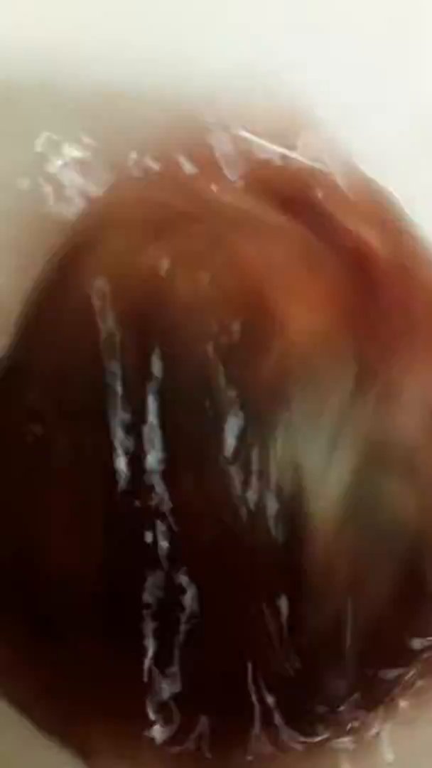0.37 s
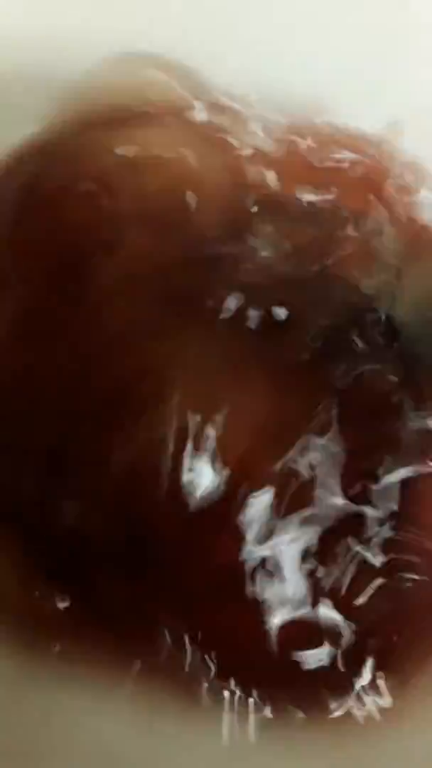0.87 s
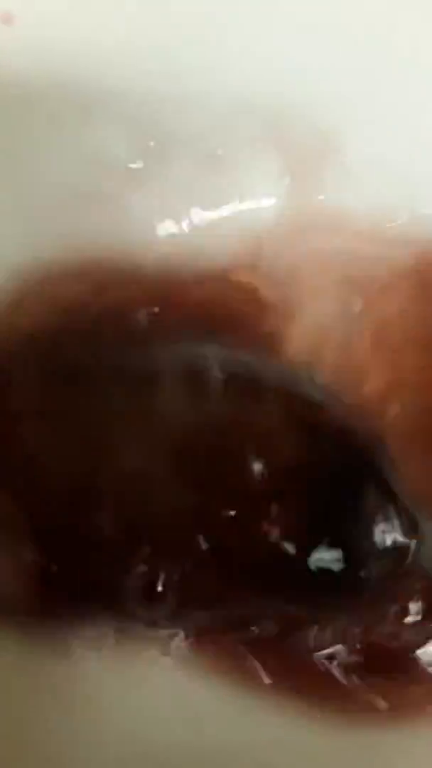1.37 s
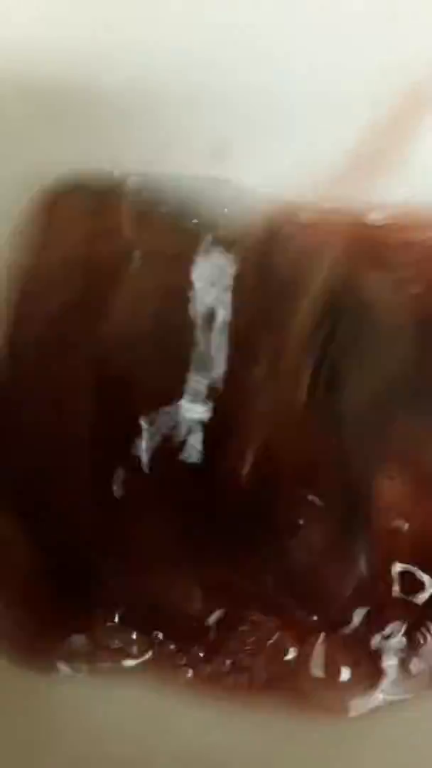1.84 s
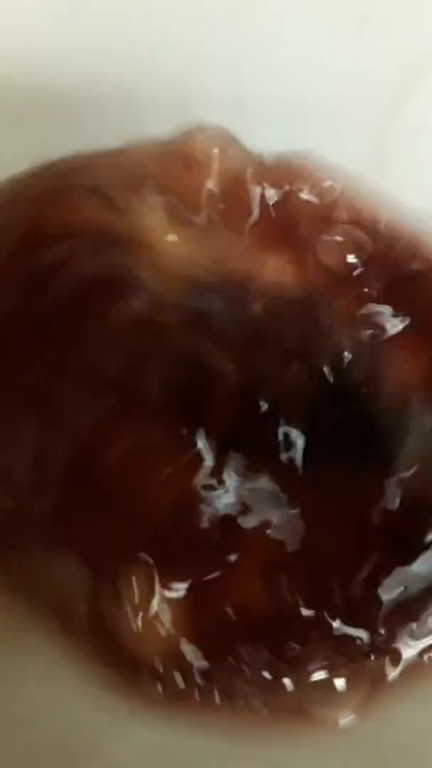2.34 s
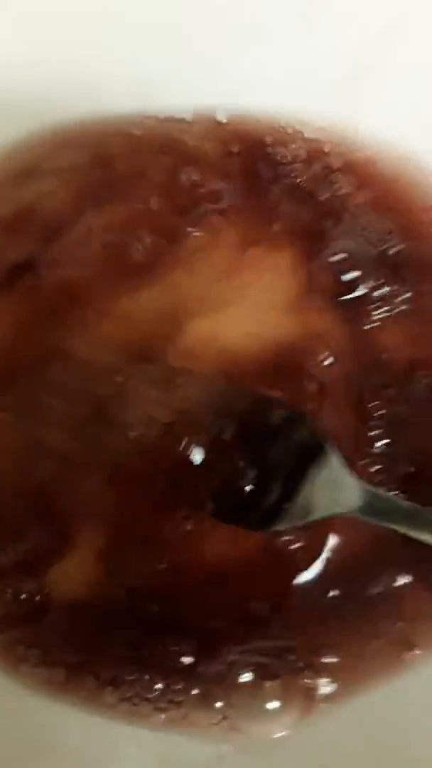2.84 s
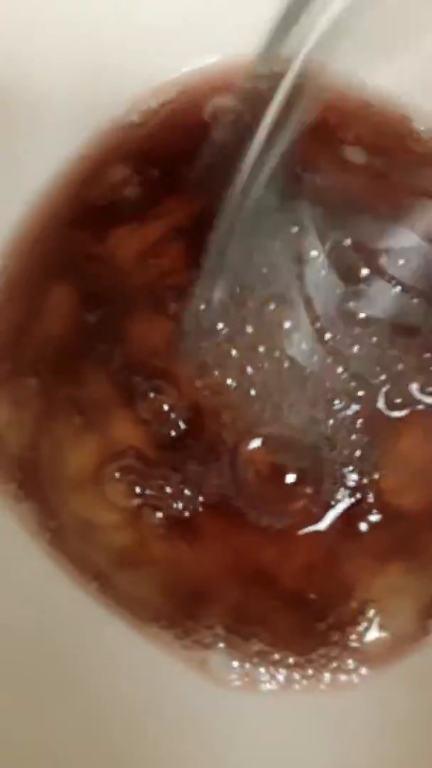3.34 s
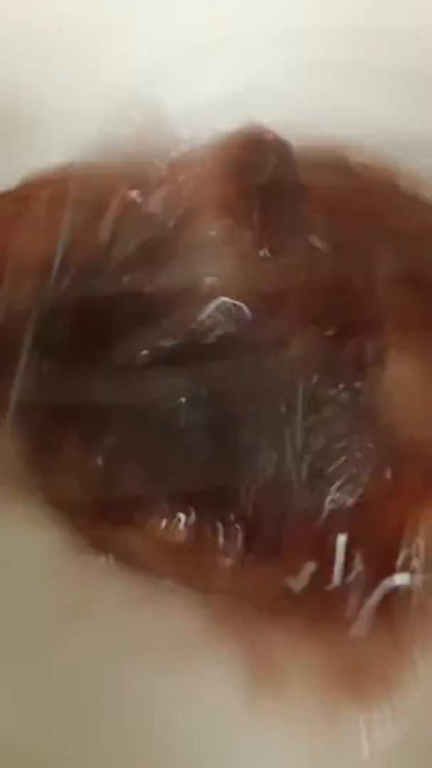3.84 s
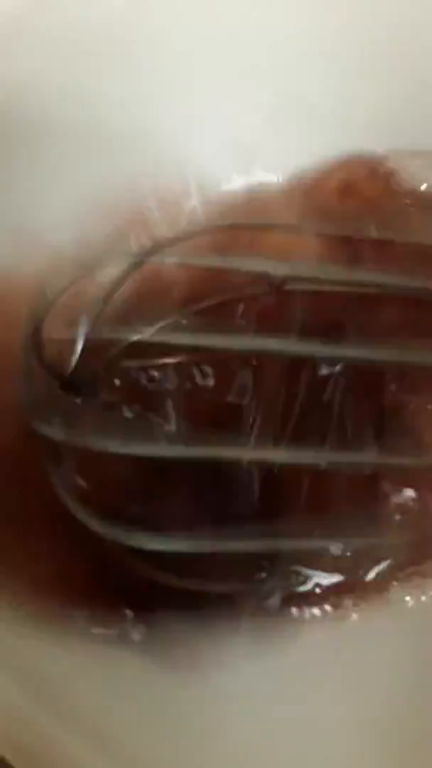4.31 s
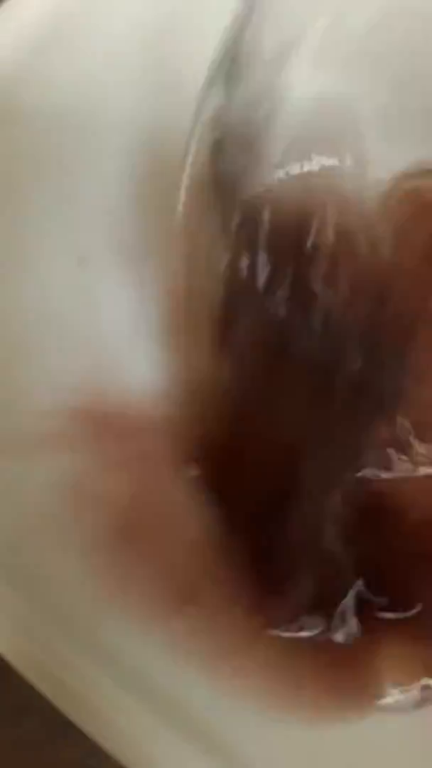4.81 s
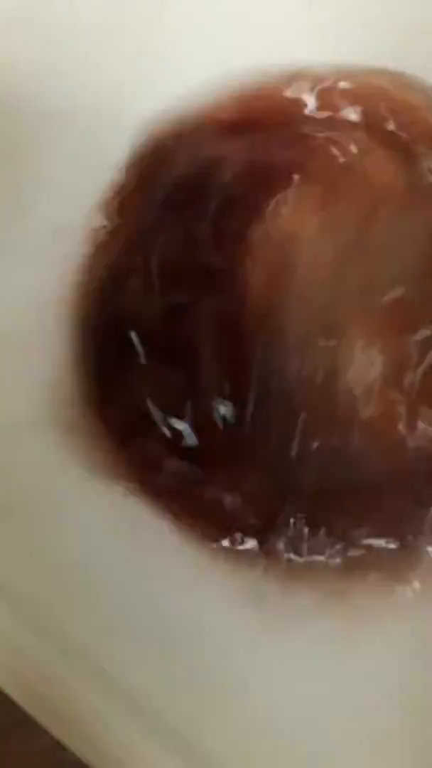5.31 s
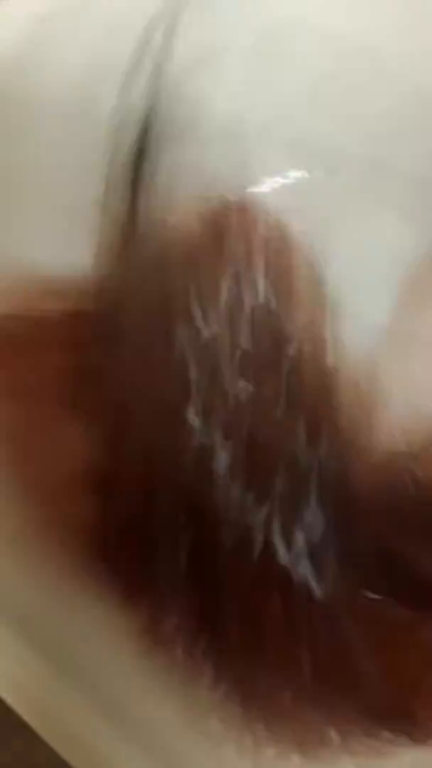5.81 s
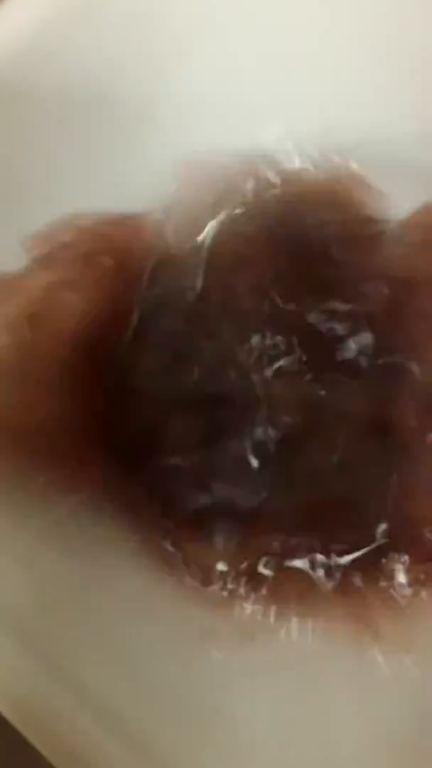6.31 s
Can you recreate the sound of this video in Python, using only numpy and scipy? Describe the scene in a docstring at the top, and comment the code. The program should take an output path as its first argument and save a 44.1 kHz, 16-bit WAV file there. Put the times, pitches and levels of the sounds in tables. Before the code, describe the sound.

A close stereo pickup, leaning left, catches quick regular strokes of a fork ringing against a ceramic bowl, with soft counter knocks and bubbly plops from thick liquid. After a brief near-silent gap, louder room hum and hiss come in and a wire whisk starts, its strokes more smeared and wiry, with small bubbles chirping. Short echoes suggest a small kitchen.

```python
"""A fork clinks as it beats a thick liquid in a glazed bowl on a kitchen counter; after a pause a whisk takes over.
Each stroke is a cluster of metal touches that rings tool, bowl and counter, each made of dying sines.
Air pockets plop and small bubbles and drops chirp in the liquid, as short sines that rise in pitch.
A close pair of microphones also hears echoes of the small room, and rumble, hum and hiss made of shaped noise.
This background mostly sinks through each tool's turn and comes back louder when the whisk's turn starts."""
import sys
import numpy as np
from scipy import signal
from scipy.fft import rfft, irfft
from scipy.io import wavfile

SR = 44100
rng = np.random.default_rng(int(sys.argv[2]) if len(sys.argv) > 2 else 0)


def decibels_to_gain(level_db):
    """Convert a level in decibels to a linear amplitude gain (20 dB per decade)."""
    exponent = np.asarray(level_db, float) / 20
    return 10 ** exponent


def unload_audio(sound):
    """Save the sound as a 16-bit wav file, at the path given as the first command line argument."""
    columns = np.transpose(np.atleast_2d(sound))
    # keep every value between -1 and 1, then stretch to whole-number steps
    steps = np.round(np.clip(columns, -1, 1) * 32767)
    wavfile.write(sys.argv[1], SR, steps.astype(np.int16))


N = 283122  # length [samples]

# All levels in the tables are relative: the functions add their own gain.
# firm strokes: (time [s], metal tick [dB], bowl note [Hz], bowl note level [dB], low push [dB])
FIRM_STROKES = [(0.0536, -26, 1899, -19, -38), (0.2718, -22.5, 1777, -26.5, -25.5),
                (0.33, -29.5, 1710, -27, -49.5), (0.473, -19, 1800, -21.5, -23),
                (0.526, -27, 1687, -14, -56.5), (0.6736, -21, 2046, -29.5, -17),
                (0.879, -22, 1800, -22, -36.5), (0.9436, -36, 1886, -26.5, -50),
                (1.082, -20.5, 1838, -21, -29.5), (1.161, -36, 1593, -36, -80),
                (1.2941, -20.5, 2030, -23, -34), (1.3507, -36.5, 1795, -26, -75.5),
                (1.502, -22, 1810, -21.5, -45), (1.71, -18.5, 1708, -22.5, -58),
                (1.928, -26, 1738, -16.5, -60), (2.1257, -23, 1628, -20.5, -67),
                (2.195, -39, 1763, -33.5, -74), (2.333, -28, 1745, -21.5, -64),
                (3.584, -19.5, 1900, -25, -47), (3.8172, -21, 1953, -16, -53),
                (4.0337, -20.5, 1983, -18, -68), (4.246, -21, 1800, -21, -56),
                (4.4658, -20, 2290, -18, -42), (4.68, -16.5, 1953, -19, -35.5),
                (4.888, -16, 1800, -19.5, -50), (5.0646, -20, 1790, -30.5, -41),
                (5.09, -28.5, 1800, -31.5, -62), (5.287, -27.5, 1747, -25, -67),
                (5.356, -37.5, 1960, -39.5, -62), (5.488, -23, 1840, -21, -66),
                (5.5497, -25, 1790, -39, -65), (5.688, -16.0, 1860, -11, -35),
                (5.8924, -17.5, 1860, -22.5, -30), (6.093, -22.5, 1830, -22.5, -62),
                (6.3009, -20, 1874, -24.5, -35)]
# light, glancing touches between the strokes: (time [s], metal tick [dB])
LIGHT_TOUCHES = [(0.0447, -54), (0.114, -46), (0.155, -53), (0.211, -60), (0.456, -34), (0.515, -45),
                 (0.557, -36), (0.597, -53.5), (0.657, -45.5), (0.722, -42), (0.868, -48), (0.8745, -34),
                 (1.036, -56.5), (1.071, -38.5), (1.127, -46.5), (1.274, -53), (1.287, -43), (1.55, -39),
                 (1.7, -35.5), (1.775, -54), (1.911, -41.5), (1.968, -41), (2.055, -59.5), (2.113, -38),
                 (2.282, -56), (2.321, -38.5), (2.435, -43.5), (2.492, -55.5), (3.721, -55.5), (3.802, -48),
                 (3.856, -45.5), (3.889, -46.5), (4.03, -53), (4.232, -47.5), (4.458, -38.5),
                 (4.561, -53.5), (4.616, -55), (4.672, -38), (4.726, -41), (4.869, -49.5), (5.249, -57.5),
                 (5.269, -36.5), (5.472, -42.5), (5.478, -25), (5.683, -35), (5.798, -55.5), (5.868, -51.5),
                 (6.08, -46.5), (6.267, -49.5)]
# ringing modes of the fork: (pitch [Hz], width [Hz], level [dB])
FORK_MODES = [(2945, 17, -12), (3740, 190, -6), (4850, 160, -12.5), (6050, 83, -4.5), (7336, 26, 5),
              (8430, 340, 0.5), (8950, 28, -7.5), (9170, 73, -4), (10170, 190, -6.5), (10620, 43, -7.5),
              (10650, 72, -26.5), (12800, 220, -29), (14400, 170, -24), (13200, 130, -26.5)]
# ringing modes of the wire whisk: (pitch [Hz], width [Hz], level [dB])
WHISK_MODES = [(3344, 630, 8), (4075, 51, -10), (4300, 15.1, -6), (5640, 360, -0.5), (5910, 20, -10.5),
               (6240, 31, -10), (6830, 37, -8), (7600, 400, 6.5), (8320, 260, 5), (9770, 360, -0.5),
               (11780, 110, -15), (13100, 400, -18.5)]
# strokes that set the dry rim of the bowl ringing: (time [s], level [dB])
RIM_HITS = [(.472, -54), (1.501, -62), (2.333, -56), (3.583, -55), (3.817, -54), (4.034, -65), (5.487, -62)]
# air pockets plopping, mostly together with a touch of the tool: (time [s], peak level [dB], pitch [Hz])
AIR_PLOPS = [(0.208, -51, 1120), (0.453, -31.5, 1030), (1.07, -30, 1260), (1.162, -42, 888),
             (1.276, -29.5, 1410), (1.661, -40, 1140), (1.704, -13, 1095), (1.819, -26, 860),
             (1.91, -26, 1210), (2.114, -24, 1055), (2.317, -41, 1010), (2.433, -39, 1390),
             (4.231, -25.5, 1080), (5.353, -39, 1085), (5.544, -29, 883), (6.088, -23.5, 1050),
             (6.209, -32.5, 813), (6.267, -32, 1110)]
# small bubbles bursting: (time [s], peak level [dB], pitch [Hz])
BUBBLE_BURSTS = [(1.7735, -36, 2730), (1.7844, -40.5, 3600), (2.1956, -28.5, 2750), (4.563, -31, 3680),
                 (4.6134, -37, 7730), (5.447, -48, 5760), (5.6124, -48, 5500), (5.678, -29, 3830),
                 (5.8167, -42, 7100), (5.831, -29, 3760), (5.8775, -39, 7100), (6.0197, -46, 4300),
                 (6.0802, -50, 7290), (6.193, -47, 4030), (6.2855, -37, 3580)]
# modes of counter and bowl foot: (pitch [Hz], time to die by 60 dB [s], level under fork [dB], under whisk [dB])
COUNTER_MODES = [(230.6, 0.2, -6.5, -3.5), (261.2, 0.1, -8.5, -1), (312.5, 0.17, -14.5, -0.5),
                 (436.5, 0.089, 6.5, -6.5), (596, 0.097, -8, -1)]
# stereo position of the strokes, one list for each tool: (time [s], left minus right [dB])
LEFT_OVER_RIGHT = [
    [(0.0, 6.5), (1.0, 5), (2.55, 2.5)],
    [(3.56, 5), (4.3, 7), (6.42, 4.5)],
]
# room echoes by band: (band centre [Hz], time to die by 60 dB [s], level [dB])
ROOM_BANDS = [(250, 0.26, -15), (614, 0.21, -1), (1800, 0.2, -5), (4550, 0.19, -5), (9200, 0.15, -5),
              (14000, 0.24, -12)]
# background levels, one list for each tool's turn: (time [s], rumble [dB], hum [dB], hiss [dB])
BACKGROUND_LEVELS = [
    [(0.0, -67, -57.5, -68.5), (0.64, -61.5, -58.5, -73.5), (1.47, -79, -64, -75),
     (2.96, -88.5, -62, -80.5)],
    [(2.98, -58.5, -49, -59.5), (4.2, -60.5, -51, -59.5), (5.44, -65.5, -57, -63), (6.42, -71, -62.5, -66)],
]
# spectrum shape of the rumble: (frequency [Hz], level per Hz [dB])
RUMBLE_SHAPE = [(15, -46), (25, -16), (70, -9), (92, -2), (113, 0), (145, -7), (170, -2), (220, -32),
                (370, -120)]
# spectrum shape of the appliance hum: (frequency [Hz], level per Hz [dB])
HUM_SHAPE = [(88, -42), (150, -34), (221, 2), (257, -14), (292, -5.5), (354, -8), (424, -6.5), (467, -15.5),
             (501, -3.5), (574, -23), (606, -15.5), (705, -13), (814, -20.5), (874, -18.5), (1000, -29),
             (1300, -62), (2200, -120)]
# spectrum shape of the hiss: (frequency [Hz], level per Hz [dB])
HISS_SHAPE = [(500, -35), (850, -13), (1090, -8), (1130, -3), (1390, -9), (1950, -2.5), (2690, -17.5),
              (3760, -16), (4410, -18), (5060, -13.5), (5800, -13.5), (7420, -27), (15200, -32.5),
              (16400, -35)]
# how alike the background is left and right: (frequency [Hz], likeness [1 same, 0 unrelated, -1 opposite])
LIKENESS_BY_HZ = [(60, 0.85), (180, 1), (550, 0.39), (1650, -0.11), (4970, -0.75), (15000, 0.77)]

SWAP_S = 2.97  # events after this time belong to the whisk


def metal():
    """Tines or wires land one after another, each touch cracking and ringing the tool's modes, then skid wetly."""
    s, tick_db = blows()[:2]
    wires = s > SWAP_S
    force = np.clip((tick_db + 64.0) / 40, .15, 1)  # light touches are over sooner
    index, gain = heard_at(s, rng.standard_normal(len(s)))
    size = gain * decibels_to_gain(tick_db)
    touch_spread_s = force * by_tool(s, fork=.003, whisk=.005)
    touch, strength = contacts(index, size, touch_spread_s, 18.0, count=40)
    skid_spread_s = force * by_tool(s, fork=.018, whisk=.021)
    skid_size = size * decibels_to_gain(by_tool(s, fork=-9.0, whisk=-8.0))
    skid = train(*contacts(index, skid_size, skid_spread_s, 27.0, count=700))
    # the skid catches and slips every few ms
    knots = np.arange(0, N, 180)
    clumps_db = np.interp(np.arange(N), knots, rng.standard_normal(len(knots)))
    skid = skid * decibels_to_gain(5.5 * clumps_db - 3)
    band = signal.butter(3, [650, 13000], "band", fs=SR, output="sos")
    out = decibels_to_gain(23.0) * signal.sosfilt(band, train(touch, strength) + skid)
    for modes, used, level_db in ((FORK_MODES, ~wires, 2.0), (WHISK_MODES, wires, -1.0)):
        for hz, width_hz, db in modes:
            chance = rng.standard_normal((len(s), 3)).T
            # one chance for the whole stroke, then one for each microphone
            struck = used * decibels_to_gain(db + level_db + 5.5 * chance[0] + 2.0 * chance[1:])
            t60 = 2.2 / (width_hz + 80)  # wider modes die sooner
            out += ring(train(touch, strength * struck[:, :, None]), hz, t60)
    return out


def bowl():
    """The bowl's main note shifts with the liquid on its wall; later touches wake its neighbours; the rim rings on."""
    s, _, hz, note_db, _, _ = blows()
    out = blips(s, note_db + 2.5, hz, by_tool(s, fork=.055, whisk=.035), rise=0.0048)
    # six neighbouring notes for each blow
    for late, detune in rng.standard_normal((len(s), 2, 6)).T:
        side_s = s + .004 * np.abs(late)
        side_db = note_db + by_tool(s, fork=-7.0, whisk=-4.0)
        out += blips(side_s, side_db, hz * (1 + .09 * detune), 0.053 + 0 * s, rise=.01)
    at, rim_db = np.transpose(RIM_HITS)
    index, gain = heard_at(at, 0 * at)
    rim_clicks = train(index[[0, 0]], gain * decibels_to_gain(rim_db))  # no delay between the two sides
    return out + ring(rim_clicks, hz=1972, t60=.8)


def liquid():
    """Pockets of air plop with rising pitch; small bubbles burst as brief, mostly higher chirps."""
    # every firm stroke with a tick above -27.5 dB also traps air
    hit, tick_db = np.transpose([row[:2] for row in FIRM_STROKES if row[1] > -27.5])
    trapped_db = tick_db + by_tool(hit, fork=-15, whisk=0.5)
    trapped_hz = 1177 * np.exp(0.16 * rng.standard_normal(len(hit)))
    trapped = [hit + .002, trapped_db, trapped_hz]
    s, peak_db, hz = np.hstack([np.transpose(AIR_PLOPS), trapped])
    plops = blips(s, peak_db, hz, 42.0 / hz, rise=0.02)  # 42 cycles to die by 60 dB
    at, burst_db, burst_hz = np.transpose(BUBBLE_BURSTS)
    return plops + blips(at, burst_db, burst_hz, 60.0 / burst_hz, rise=0.082)


def spatter():
    """Thrown liquid lands in tiny drops after each firm stroke, each a brief chirp at a pitch of its own."""
    low_hz, high_hz = 1900, 7600
    hit, tick_db = np.transpose(FIRM_STROKES)[:2, :, None]
    late, size, loud = rng.random((len(FIRM_STROKES), 3, 8)).transpose(1, 0, 2)  # eight drops a stroke
    late = -np.log(.05 + .95 * late)  # most drops fall early, a few late
    hz = low_hz * (high_hz / low_hz) ** size
    s = np.minimum(hit + .008 + 0.037 * late, N / SR - .002)
    peak_db = tick_db - 21 - 5.6 * late + 14.0 * loud
    return blips(s.ravel(), peak_db.ravel(), hz.ravel(), 45 / hz.ravel(), rise=.12)


def counter():
    """The blow goes softly through the bowl's foot into the counter; its deepest push is mostly on the left."""
    s, _, _, _, thud_db, push_db = blows()
    index, gain = heard_at(s, 0 * s)
    push_size = decibels_to_gain(push_db + 17.5 + np.array([[0], [-20.0]]))  # left, right
    push = ring(train(index, push_size), hz=150, t60=0.0072)
    push = signal.sosfilt(signal.butter(4, 62.0, "high", fs=SR, output="sos"), push)
    knock = np.zeros((2, N))
    rocking_s = by_tool(s, fork=.003, whisk=.008)
    for hz, t60, fork_db, whisk_db in COUNTER_MODES:
        chance = rng.standard_normal((len(s), 3)).T
        level_db = thud_db + by_tool(s, fork_db, whisk_db) + 2.0 * chance[0] + 1.3 * chance[1:]
        rocking = contacts(index, decibels_to_gain(level_db), rocking_s, 6.8, count=3)
        knock += ring(train(*rocking), hz, t60)
    knock = signal.sosfilt(signal.butter(4, 150, "high", fs=SR, output="sos"), knock)
    return signal.sosfilt(signal.butter(2, 1000, fs=SR, output="sos"), push + knock)


def room(x):
    """Dense reflections die away band by band, unrelated in the two channels."""
    t, tail = np.arange(SR // 2) / SR, 0
    white = rng.standard_normal((2, SR // 2))
    for hz, t60, db in ROOM_BANDS:
        edges = [hz / 1.3, min(hz * 1.5, .45 * SR)]
        band = signal.sosfilt(signal.butter(2, edges, "band", fs=SR, output="sos"), white)
        # the divisor keeps long tails from being louder overall
        tail = tail + band * decibels_to_gain(db - 60 * t / t60) / np.sqrt(t60 * SR / (6 * np.log(10)))
    tail = tail * (1 - np.exp(-t / 0.003))  # echoes build up over a few ms
    return signal.fftconvolve(x[:1] + x[1:], tail, axes=1)[:, :N] / 2


def background():
    """Rumble, appliance hum and hiss, a little stronger on the right, lie over the microphones' own noise."""
    levels = in_time(BACKGROUND_LEVELS, np.arange(N) / SR)
    shapes = (RUMBLE_SHAPE, HUM_SHAPE, HISS_SHAPE)
    layers = sum(decibels_to_gain(db) * coloured(shape) for db, shape in zip(levels, shapes))
    mic_noise = decibels_to_gain(-83) * rng.standard_normal((2, N))
    return layers * decibels_to_gain([[-1.2], [1.2]]) + mic_noise


def coloured(spectrum):
    """Shape stereo noise to a spectrum, as alike left and right as the likeness table says, at rms 1."""
    hz = np.fft.rfftfreq(N, 1 / SR)
    mid, side = rfft(rng.standard_normal((2, N))) * decibels_to_gain(at_hz(spectrum, hz))
    alike = np.clip(at_hz(LIKENESS_BY_HZ, hz), -1, 1)
    mid, side = np.sqrt(1 + alike) * mid, np.sqrt(1 - alike) * side
    return rms_one(irfft(np.array([mid + side, mid - side]), N))


def blows():
    """List all contacts: time, tick dB, note Hz, note dB, thud dB, push dB; some follow from the tick."""
    at, tick_db = np.transpose(LIGHT_TOUCHES)
    hz = 1830 * (1 + .08 * rng.standard_normal(len(at)))
    note_db = tick_db + by_tool(at, fork=-1.5, whisk=3.0)
    light = [at, tick_db, hz, note_db, tick_db - 25.5]
    s, tick_db, hz, note_db, push_db = np.hstack([np.transpose(FIRM_STROKES), light])
    thud_db = by_tool(s, fork=-17.5 + 1.01 * tick_db, whisk=-14 + 0.69 * tick_db)
    # the whisk bears down less as it goes on: 2.5 dB less each second
    thud_db = thud_db - 2.5 * np.maximum(s - SWAP_S, 0)
    return s, tick_db, hz, note_db, thud_db, push_db


def contacts(index, size, spread_s, range_db, count):
    """Each blow becomes many touches that thin out and weaken with time; their shares have unit energy."""
    draw = rng.random((len(spread_s), 3, count))
    late = -np.log(.03 + .97 * draw[:, 0])
    late[:, 0] = 0  # the first touch comes at once
    share = decibels_to_gain(-range_db * draw[:, 1] - 0.37 * late) * np.sign(draw[:, 2] - .5)
    share /= np.sqrt(np.sum(share ** 2, axis=1, keepdims=True))
    later = (late * spread_s[:, None] * SR).astype(int)
    later = later + rng.integers(0, 4, (2, *later.shape))  # touches lie at different spots
    return np.minimum(index[:, :, None] + later, N - 1), size[:, :, None] * share


def heard_at(s, scatter):
    """Find each event's sample index and gain at both microphones; sound usually reaches the left one first."""
    pan_db, = in_time(LEFT_OVER_RIGHT, s)
    lag_s = .00026 * (1 + .6 * scatter)
    index = np.round(np.array([s - lag_s / 2, s + lag_s / 2]) * SR).astype(int)
    return np.clip(index, 0, N - 1), decibels_to_gain(np.array([pan_db, -pan_db]) / 2)


def train(index, size):
    """Place clicks of the given sizes in a stereo signal."""
    return np.array([np.bincount(i.ravel(), g.ravel(), N) for i, g in zip(index, size)])


def ring(clicks, hz, t60):
    """A unit click sets a sine of starting height about 1 ringing; it dies by 60 dB in t60 seconds."""
    r, w = decibels_to_gain(-60 / (t60 * SR)), 2 * np.pi * hz / SR
    return signal.lfilter([0, np.sin(w)], [1, -2 * r * np.cos(w), r * r], clicks + 1e-18)


def blips(s, peak_db, hz, t60, rise):
    """Make one dying sine an event, its pitch climbing by the share rise while it dies by 60 dB."""
    out, t = np.zeros((2, N + SR)), np.arange(SR // 8) / SR
    index, gain = heard_at(s, rng.standard_normal(len(s)))
    for k in range(len(s)):
        glide = t + rise * np.minimum(t, t60[k]) ** 2 / (2 * t60[k])
        tone = np.sin(2 * np.pi * hz[k] * glide)
        wave = decibels_to_gain(peak_db[k] - 60 * t / t60[k]) * tone * (1 - np.exp(-t / 0.00027))  # soft start
        for side in (0, 1):
            start = index[side, k]
            out[side, start:start + len(t)] += gain[side, k] * wave
    return out[:, :N]


def by_tool(s, fork, whisk):
    """Choose the fork's or the whisk's setting for events at times s."""
    return np.where(s > SWAP_S, whisk, fork)


def in_time(rows, s):
    """Read the columns of a curve at times s."""
    at, *columns = np.transpose(np.concatenate(rows))
    return [np.interp(s, at, c) for c in columns]


def at_hz(points, hz):
    """Read a spectrum on a log-frequency axis."""
    table_hz, value = np.transpose(points)
    return np.interp(np.log(hz + 1), np.log(table_hz), value)


def rms_one(x):
    """Scale to rms 1."""
    return x / np.sqrt(np.mean(x ** 2) + 1e-20)


def scene():
    """Mix the direct sounds, their room echoes and the background; bowl and liquid carry no bass."""
    bass_cut = signal.butter(4, 550, "high", fs=SR, output="sos")
    clink = metal() + signal.sosfilt(bass_cut, bowl())
    thud = counter()
    wet = signal.sosfilt(bass_cut, liquid() + spatter())
    # the counter below and the liquid deep in the bowl reach the room less
    sent = clink + decibels_to_gain(-6) * thud + decibels_to_gain(-7) * wet
    echoes = room(sent) * decibels_to_gain([[2.2], [-2.2]])  # left, right
    return clink + thud + wet + echoes + background()


def top_cut(x):
    """Nothing passes above the cut-off."""
    return signal.sosfilt(signal.butter(12, 16550, fs=SR, output="sos"), x)


def record(dry):
    """Peaks beyond full scale are clipped, then the deepest bass is cut."""
    clipped = np.clip(dry, -1, 1)
    finished = signal.sosfilt(signal.butter(2, 45.0, "high", fs=SR, output="sos"), clipped)
    return top_cut(finished)


dry = scene()
out = record(dry)
unload_audio(out)
```